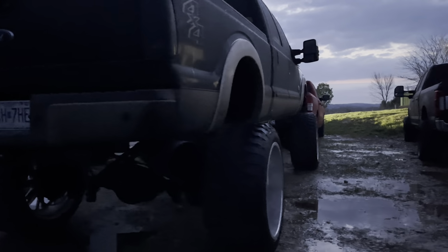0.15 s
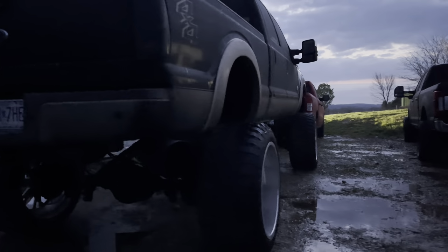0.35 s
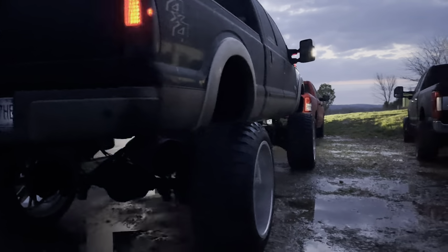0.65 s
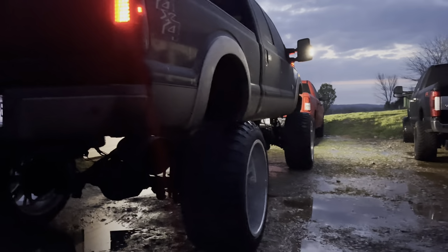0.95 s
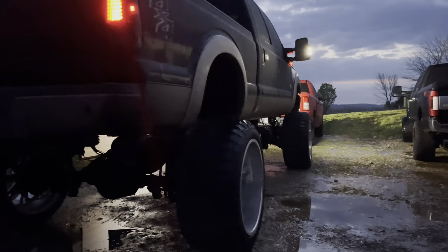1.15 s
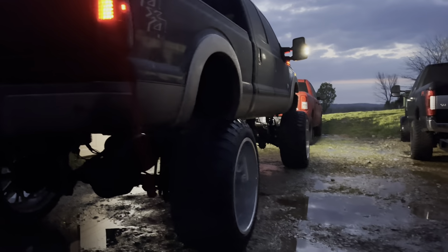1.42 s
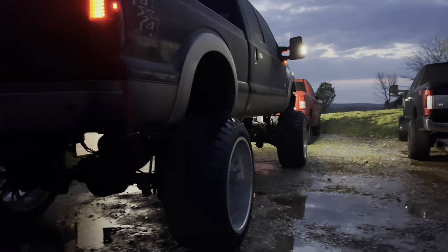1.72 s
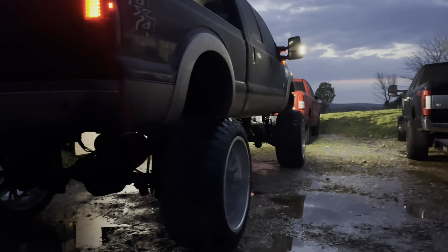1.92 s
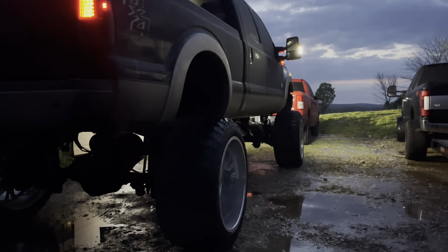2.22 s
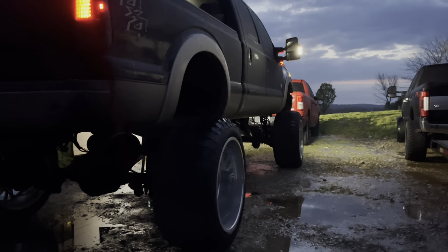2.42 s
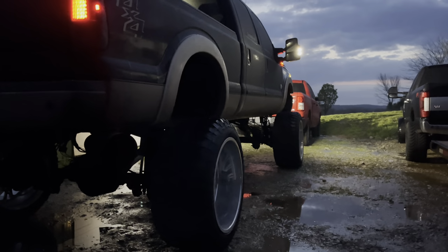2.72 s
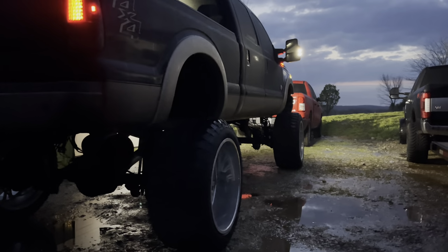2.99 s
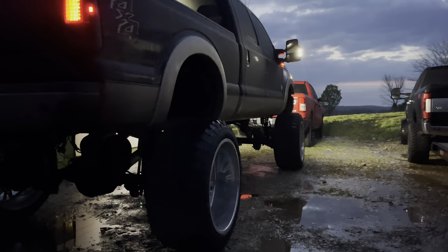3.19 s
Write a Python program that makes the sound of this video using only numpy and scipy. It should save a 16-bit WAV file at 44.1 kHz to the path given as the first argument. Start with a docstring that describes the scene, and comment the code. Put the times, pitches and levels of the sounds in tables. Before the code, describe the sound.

A big diesel pickup engine starts in an open yard, heard from behind the rear wheel. The starter whines and grinds through four quick compressions. At about 0.4 seconds the engine catches with hard knocks, and the exhaust barks briefly around 0.6 seconds. From about 0.8 seconds until the end, near 3.4 seconds, it idles steadily with a deep, loping throb, metallic clatter, ticking and occasional sharper knocks.

```python
"""V8 diesel pickup starting

A big truck in an open yard, heard from behind its rear wheel. The starter whines and grinds
through four compressions; the engine catches with a few hard knocks and settles into a loping idle.
Combustion and injectors clatter in the block while uneven cylinder pulses throb in the exhaust pipe."""
import sys
import numpy as np
from scipy import signal
from scipy.fft import rfft, irfft
from scipy.io import wavfile
from scipy.ndimage import uniform_filter1d

SR = 44100
rng = np.random.default_rng(int(sys.argv[2]) if len(sys.argv) > 2 else 0)


def int16_out(signal):
    """Quantize to a 16-bit WAV file."""
    q = np.round(np.clip(np.atleast_2d(signal).T, -1, 1) * 32767)
    wavfile.write(sys.argv[1], SR, q.astype(np.int16))


N = 147735
TIME = np.arange(N) / SR
RING = np.arange(SR // 8) / SR  # time within one short event
FIRINGS_PER_CYCLE = 8

# engine speed from the first firing on: t/s, firing rate/Hz
SPEED = [(0.394, 28.02), (0.445, 28.47), (0.53, 44.05), (0.66, 45.01), (0.8, 42.22), (0.98, 44.92),
         (1.33, 46.43), (1.85, 47.25), (2.2, 44.67), (3.35, 45.07)]
# compressions under the starter: t/s, gear grind/dB, exhaust puff/dB, whirr pitch/Hz
STROKES = [(-.001, -22.5, -12, 2528), (0.09, -21, -0.5, 3026), (0.19, -22.5, -10, 3318),
           (0.278, -23, -10.5, 3318)]
# resonances of the engine block and chassis: f/Hz, level/dB
BLOCK = [(60, -13.5), (180, 4), (222, -5), (260, 1.5), (315, -0.5), (345, -5), (390, -2), (470, -9),
         (540, -5.5), (610, -9), (680, -14.5), (790, 3), (1020, 0), (1160, -14), (1310, -1), (1470, -1),
         (1600, -14), (1800, -5.5), (1960, -14), (2120, -11.5), (2230, -18.5), (2380, -8.5), (2540, -10),
         (2700, -8.5), (3050, -11.5), (3250, -14), (3450, -10.5), (3620, -14), (3850, -14.5), (4300, -17),
         (5500, -24.5), (7800, -34), (9400, -27.5)]
# likeness of the engine at the two microphones: f/Hz, correlation
ALIKE = [(100, 0.73), (300, 0.98), (1000, 0.89), (1700, 0.7), (2500, 0.98), (3300, .96), (4400, 1),
         (5400, 0.55), (6200, .6), (7300, 0.31), (8600, 0.9)]
# its stereo balance: f/Hz, left minus right/dB
TILT = [(60, 1), (350, 0.7), (620, 1.5), (730, 0.5), (950, 5), (1200, -1.5), (1400, 3), (2100, -7.5),
        (2500, -7), (3100, -2), (3600, -4.5), (4600, -3.5), (5200, 6), (6000, -1), (6800, 3.5), (9000, 0)]
# its phase between the microphones: f/Hz, left lead/rad
LEAD = [(0, 0.1), (300, 0.01), (750, 0.49), (1150, 0.82), (1400, 1.3), (1900, 0.87), (2500, 2.25),
        (3250, 2.56), (3900, 6.23), (4700, 8), (5400, 5.8), (7200, 8.7), (8200, 4), (8800, 5.9),
        (9600, 3.63)]


def amp(db):
    """Decibels to gain."""
    return 10 ** (np.asarray(db) / 20)


def unit(x):
    """Scales to rms 1."""
    return x / np.sqrt(np.mean(x ** 2) + 1e-20)


def curve(points, at=TIME):
    """Straight lines through a table."""
    return np.interp(at, *np.transpose(points))


def spectrum(points, hz):
    """Reads a table on a log-frequency axis."""
    f, value = np.transpose(points)
    return np.interp(np.log(hz + 1), np.log(f + 1), value)


def add(mix, s, sound):
    """Mixes a sound in at s seconds."""
    at = round(s * SR)
    sound = sound[..., max(-at, 0):]
    part = mix[..., max(at, 0):][..., :sound.shape[-1]]
    part += sound[..., :part.shape[-1]]


def colour(x, points, band=None):
    """Resonant body: a minimum-phase filter of unit energy with this spectrum, or one band of it."""
    hz = abs(np.fft.fftfreq(2 ** 13, 1 / SR))
    gain = amp(spectrum(points, hz))
    if band:
        gain = gain / (1 + (band[0] / (hz + 1)) ** 8 + (hz / band[1]) ** 8) + 1e-5
    log_response = np.conj(signal.hilbert(np.log(gain)))
    taps = np.fft.ifft(np.exp(log_response)).real
    return signal.fftconvolve(np.atleast_2d(x), taps[None] / np.linalg.norm(taps), axes=1)[:, :N]


def mic_pair(pair, alike, tilt, lead):
    """Blends two versions of a sound into a stereo image with this likeness, balance and phase."""
    hz = np.fft.rfftfreq(N, 1 / SR)
    a, b = rfft(pair)
    likeness = np.clip(spectrum(alike, hz), -1, 1)
    lean = amp(spectrum(tilt, hz))
    right = (likeness * a + np.sqrt(1 - likeness ** 2) * b) * np.exp(-1j * curve(lead, hz))
    return irfft(np.array([a * lean, right]) * np.sqrt(2 / (1 + lean ** 2)), N)


def burst(rise_s, decay_s):
    """Envelope of one blow: linear attack, exponential decay."""
    return np.minimum(RING / rise_s, 1) * np.exp(-np.maximum(RING - rise_s, 0) / decay_s)


def crank_times(place):
    """Times at which the crankshaft passes one place in its cycle, counted in firing intervals."""
    firings = np.cumsum(curve(SPEED) * (TIME >= SPEED[0][0])) / SR
    passes = np.arange(max(place, 1e-3), firings[-1], FIRINGS_PER_CYCLE)
    return np.interp(passes, firings, TIME)


def rings(envelope, points, band=None, count=1, alike=.48):
    """Dense metal rings of equal strength, partly alike: a pair for each of count blows on one spot."""
    common = rng.standard_normal((2, len(RING)))
    fresh = rng.standard_normal((count, 2, len(RING)))
    hits = envelope * (np.sqrt(alike) * common + np.sqrt(1 - alike) * fresh)
    rung = colour(hits.reshape(-1, len(RING)), points, band)[:, :len(RING)]
    rung = rung * np.linalg.norm(envelope) / np.linalg.norm(rung, axis=1, keepdims=True)
    return rung.reshape(hits.shape)


def cycle_blows(rows, envelope, band_hz, jitter_s=.0004, spread_db=.9):
    """Blows that return in every engine cycle and ring one band of the block."""
    out = np.zeros((2, N))
    for place, db in rows:
        hits = rings(envelope, BLOCK, band_hz, count=17)
        for s, ring, (slip, size) in zip(crank_times(place), hits, rng.standard_normal((len(hits), 2))):
            add(out, s + jitter_s * slip, amp(db + spread_db * size) * ring)
    return out


def yard(x, t60_s=.16):
    """Short scatter from the ground and the parked trucks."""
    t = np.arange(SR // 2) / SR
    tail = rng.standard_normal((2, len(t))) * amp(-60 * t / t60_s) * (t > .008)
    return signal.fftconvolve(x, tail / np.linalg.norm(tail[0]), axes=1)[:, :N]


def gear(hz, width_hz=170, waver_depth=.0093):
    """A rough, fluttering tone of meshing teeth, different on each side."""
    waver, real, imag = rng.standard_normal((3, 2, len(hz)))
    pitch = hz * (1 + waver_depth * unit(uniform_filter1d(waver, size=40)))
    flutter = signal.sosfilt(signal.butter(2, width_hz / 2, fs=SR, output="sos"), real + 1j * imag)
    return unit((flutter * np.exp(2j * np.pi * np.cumsum(pitch, axis=1) / SR)).real)


def starter():
    """Gear teeth grind and whirr downwards under each compression, and whine as the load lets go."""
    # partials of the whirr: ratio to its pitch, level against the grind/dB
    whirr = [(.28, -10), (.37, -11), (.49, -8), (1, -7), (2.15, -13)]
    # gliding gear whines: t/s, length/s, start f/Hz, end f/Hz, level/dB
    whines = [(0, 0.094, 1141, 924, -27), (0.085, .022, 6050, 6080, -26.5), (0.161, .04, 3930, 4270, -25),
              (0.243, 0.045, 3980, 4170, -27.5), (0.308, 0.073, 3880, 4230, -26.5)]
    # tone colour of the grind: f/Hz, level/dB
    grind_colour = [(250, -9), (600, -11.5), (820, -7.5), (1450, -5.5), (1900, -12.5), (2250, -9.5),
                    (3150, -8), (3520, -10), (3850, -8.5), (4600, -13), (5300, -15), (5900, -6.5),
                    (6350, -17), (6900, -9), (8300, -19.5), (9500, -16)]
    # likeness of the starter at the two microphones: f/Hz, correlation
    alike = [(300, 1), (700, 0.44), (1700, 0.7), (2400, .2), (3100, 0.25), (4000, 0.2), (8200, 0.23),
             (9000, 0.72)]
    # its stereo balance: f/Hz, left minus right/dB
    tilt = [(350, 1), (1200, 1.5), (2000, -4), (4500, -3.5), (5000, -3), (7000, 4), (9400, 1.5)]
    # its phase between the microphones: f/Hz, left lead/rad
    lead = [(0, -0.5), (1300, 1.3), (2400, -0.4), (3200, 2), (4400, 1.7), (6200, -4), (7500, 3),
            (9600, -2.5)]
    rise_s, hold_s, decay_s, sag_per_s = .0078, .039, .029, 2.8
    steady_db, off_s, fade_s = -31, .47, .07
    rasp_db, rasp_s = 1.4, .0015
    load, tones = np.zeros(N), np.zeros((2, N))
    sag = np.exp(-sag_per_s * RING)
    for s, db, _, hz in STROKES:
        effort = amp(db) * np.minimum(RING / rise_s, 1) * np.exp(-np.maximum(RING - hold_s, 0) / decay_s)
        add(load, s, effort)
        add(tones, s, effort * sum(amp(part_db) * gear(ratio * hz * sag) for ratio, part_db in whirr))
    for s, length, start_hz, end_hz, db in whines:
        glide = np.minimum(RING / length, 1)
        add(tones, s, amp(db) * np.sin(np.pi * glide) * gear(start_hz + (end_hz - start_hz) * glide))
    engaged = np.exp(-np.maximum(TIME - off_s, 0) / fade_s)
    scrape = rng.standard_normal((2, N))
    roughness = unit(uniform_filter1d(rng.standard_normal(N), round(rasp_s * SR)))
    scrape *= unit(amp(rasp_db * roughness))
    grind = colour(scrape * np.hypot(load, amp(steady_db) * engaged), grind_colour)
    return mic_pair(grind + tones, alike, tilt, lead)


def hard_knocks():
    """The hard first firings and later single knocks, each a short dense ring of the block."""
    # firings as the engine catches: t/s, level/dB, rise/s
    catches = [(.395, -14, .003), (0.43, -7.5, 0.0069), (0.465, -7, .003), (.49, -14, 0.0016),
               (.497, -9, 0.0016), (0.519, -17.5, 0.0028), (0.539, -17, 0.0082), (0.561, -12.5, 0.0046)]
    # their ring: f/Hz, level/dB
    catch_colour = [(300, 0), (560, -9.5), (780, 8.5), (920, 4), (1150, -2), (1450, 6), (1900, -0.5),
                    (2500, 6), (4200, -5), (6000, -14), (9400, -21)]
    # single knocks that stand out: t/s, level/dB
    knocks = [(0.398, -20.5), (0.743, -20.5), (.864, -22), (1.074, -18.5), (1.117, -18.5), (1.172, -23.5),
              (1.281, -16), (1.344, -24), (1.451, -16.5), (1.517, -17), (1.562, -20.5), (1.792, -22),
              (2.319, -16.5), (2.498, -21.5), (2.766, -23), (2.878, -17), (3.034, -19)]
    # their ring: f/Hz, level/dB
    knock_colour = [(300, -10.5), (650, -11), (830, 1), (1020, 9.5), (1170, -4.5), (1420, 5), (1750, -11.5),
                    (2200, -14.5), (4200, -17), (9000, -62.5)]
    out = np.zeros((2, N))
    for s, db, rise_s in catches:
        add(out, s, amp(db) * rings(burst(rise_s, decay_s=.011), catch_colour)[0])
    for s, db in knocks:
        add(out, s, amp(db) * rings(burst(rise_s=.0015, decay_s=.005), knock_colour)[0])
    return mic_pair(out, ALIKE, TILT, LEAD)


def clatter():
    """Chassis thuds, combustion clacks and injector ticks, over the rush of the fan."""
    # hollow chassis thuds in one cycle: place/firing intervals, level/dB
    thud_rows = [(.7, -8.5), (1, 2.5), (1.45, -3), (1.9, -2.5), (2.3, -9), (2.7, -6), (3.05, -6),
                 (3.78, -0.5), (4.45, -4.5), (5.42, -4), (6.25, -5.5), (6.9, -1.5), (7.3, -7), (7.85, -1.5)]
    # combustion and injectors in one cycle: place/firing intervals, clack/dB, tick/dB
    knocks = [(.05, -4, -7), (.95, 2, 4), (1.5, 1.5, 3), (1.95, -1.5, -9), (2.2, -4, 1.5), (3.1, 2, 6),
              (3.35, -5.5, -10), (3.7, -6.5, -6), (4.52, -4.5, -14.5), (5.05, -6.5, 3), (5.97, 2.5, 6.5),
              (6.5, -3.5, 1.5), (7.05, 1.5, 5.5), (7.5, -14.5, -3)]
    # gain ride on clatter and fan: t/s, level/dB
    load = [(.39, 11), (.48, -5), (.52, 3), (.58, 3.5), (.64, 2), (.72, 0), (.85, 2), (1.3, 0), (1.7, -0.5),
            (2.1, -.5), (2.5, 1), (2.9, 0), (3.35, 0.5)]
    clack_rows = [(place, db) for place, db, _ in knocks]
    tick_rows = [(place, db) for place, _, db in knocks]
    thuds = amp(-21) * cycle_blows(thud_rows, burst(.0019, .007), band_hz=(168, 720))
    clacks = amp(-21.5) * cycle_blows(clack_rows, burst(.002, .008), band_hz=(640, 2370))
    ticks = amp(-35) * cycle_blows(tick_rows, burst(.003, .017), band_hz=(2230, 10800))
    fan = amp(-28) * colour(rng.standard_normal((2, N)), BLOCK)
    running = TIME > SPEED[0][0]
    return mic_pair((thuds + clacks + ticks + fan) * amp(curve(load)) * running, ALIKE, TILT, LEAD)


def pipe_drones():
    """Two upper notes of the exhaust pipe swell and die once in each engine cycle."""
    # pipe notes: place/firing intervals, length/s, f/Hz, level/dB
    notes = [(5.9, 0.069, 177.4, -24), (8.4, 0.069, 144, -28)]
    out = np.zeros(N)
    for place, length, hz, db in notes:
        swell = np.sin(np.pi * np.minimum(RING / length, 1))
        note = amp(db) * swell * unit(np.sin(2 * np.pi * hz * RING))
        for s in crank_times(place):
            add(out, s, note)
    return out


def exhaust(jitter_s=.00015, spread_db=.45):
    """Cranking puffs, then uneven cylinder pulses, boom in the pipe; it barks as the engine flares up."""
    # each cylinder's pulse in firing order: lag/firing intervals, level/dB
    cylinders = [(0.272, 1), (0.184, 1.6), (0.298, 3.5), (-0.393, -2), (0.1115, 2.7), (0.247, 0),
                 (0.205, 1.2), (0.193, -1.5)]
    # resonances of the pipe: f/Hz, level/dB
    pipe = [(20, -45), (33, -34), (45, -11.5), (60, -4.5), (75, -2), (95, -15), (118, -11), (152, -27),
            (175, -25.5), (215, -49), (280, -42), (600, -60), (2000, -86)]
    # pulse strength feeding the boom: t/s, level/dB
    push = [(0, 3), (.4, -2.5), (.445, 5.5), (.48, -7), (.52, -5), (.56, 2), (.64, 2.5), (.8, -2),
            (1.1, 0.5), (2, 0.5), (3.35, 1)]
    # tone colour of the bark: f/Hz, level/dB
    bark_colour = [(90, -47), (140, 2), (165, 1), (183, 6), (200, -1.5), (218, -19.5), (240, 5), (285, 3.5),
                   (330, -2.5), (378, 6), (430, -15.5), (520, -12.5), (650, -22.5), (1500, -74.5)]
    # swell of the bark: t/s, level/dB
    bark_level = [(.38, -64), (.43, -32), (.53, -24), (.575, -20.5), (.65, -36), (.8, -43), (3.35, -34)]
    pulses = np.zeros(N)
    for k, (lag, db) in enumerate(cylinders):
        for s, (slip, size) in zip(crank_times(k + lag), rng.standard_normal((32, 2))):
            add(pulses, s + jitter_s * slip, amp([db + spread_db * size]))
    for s, _, puff_db, _ in STROKES:
        add(pulses, s + .037, amp([puff_db]))  # the puff trails its compression
    boom = amp(-16) * unit(colour(pulses * amp(curve(push)), pipe))
    rumble = amp(-35) * colour(rng.standard_normal(N), pipe)
    bark = amp(curve(bark_level)) * unit(colour(pulses, bark_colour))
    lean_db = TILT[0][1]  # panned like the engine's bass
    return (boom + rumble + bark + pipe_drones()) * amp([[lean_db / 2], [-lean_db / 2]])


def scene():
    """Engine bay sounds with their scatter, and the tailpipe close by."""
    bay = starter() + clatter() + hard_knocks()
    return bay + amp(-12) * yard(bay) + exhaust()


def record(dry, ceiling=.9, cutoff_hz=9750):
    """A soft clip rounds off the highest peaks and a steep low-pass trims the top."""
    clipped = dry / (1 + (dry / ceiling) ** 8) ** (1 / 8)
    lowpass = signal.firwin(511, cutoff_hz, window=("kaiser", 9), fs=SR)
    return signal.oaconvolve(clipped, lowpass[None], "same")


dry = scene()
out = record(dry)
int16_out(out)
```